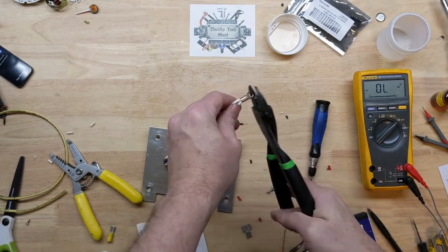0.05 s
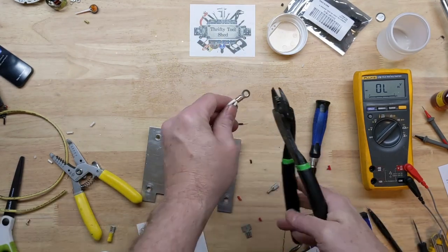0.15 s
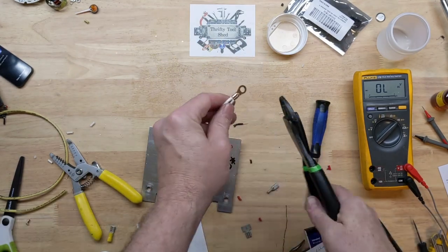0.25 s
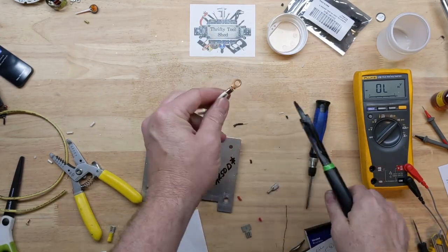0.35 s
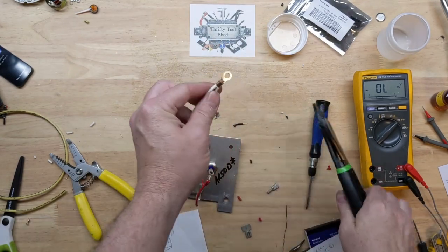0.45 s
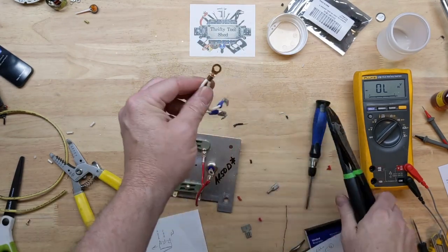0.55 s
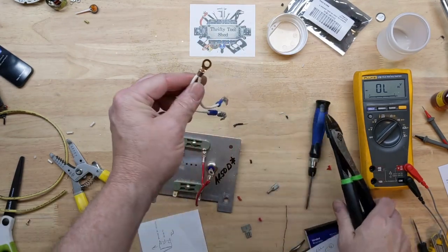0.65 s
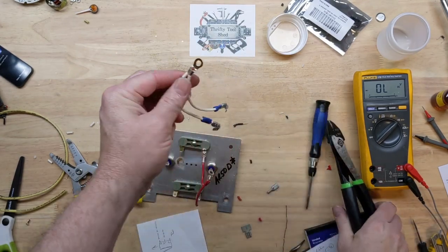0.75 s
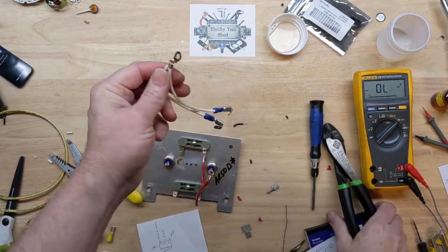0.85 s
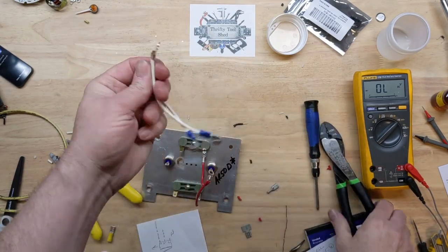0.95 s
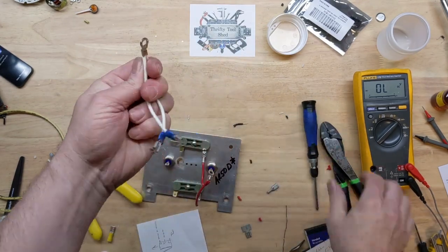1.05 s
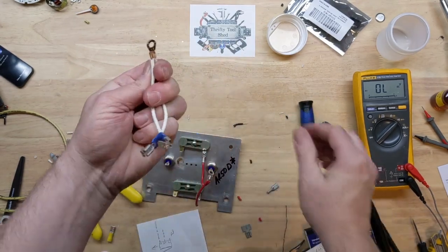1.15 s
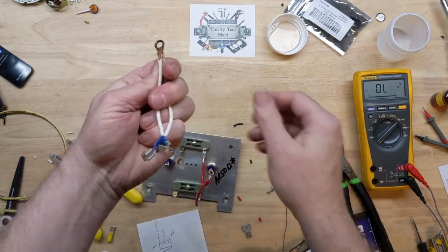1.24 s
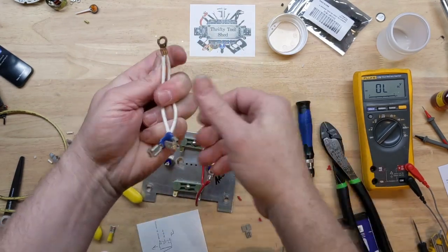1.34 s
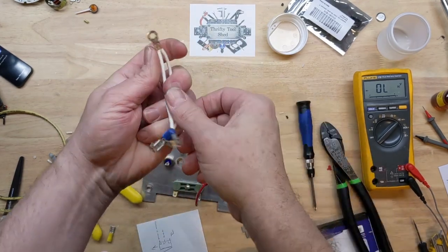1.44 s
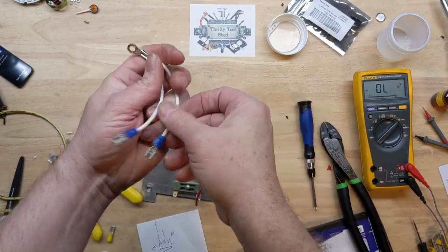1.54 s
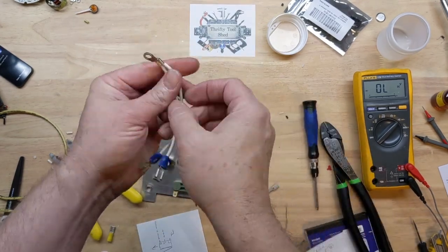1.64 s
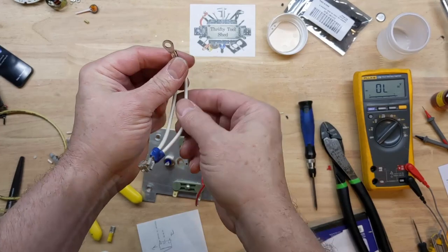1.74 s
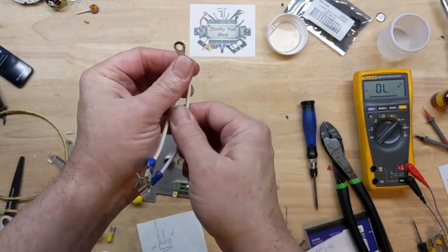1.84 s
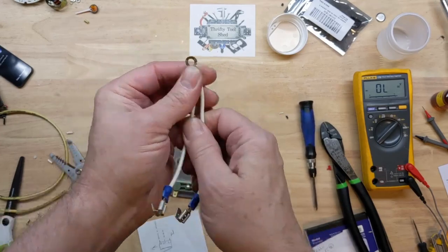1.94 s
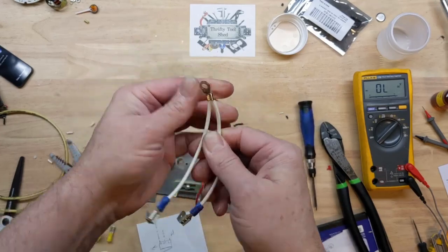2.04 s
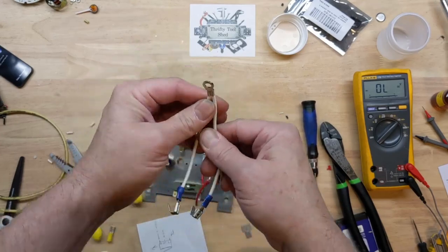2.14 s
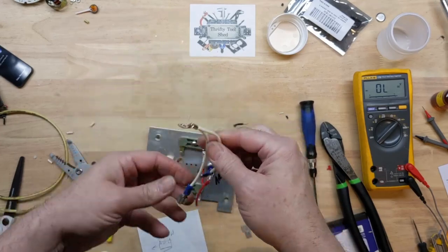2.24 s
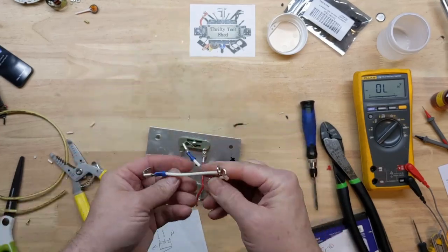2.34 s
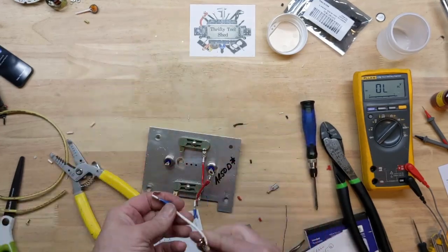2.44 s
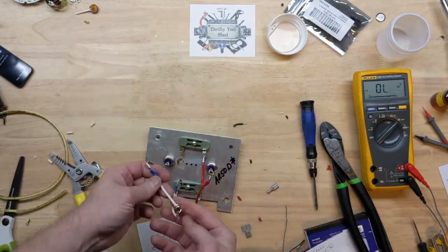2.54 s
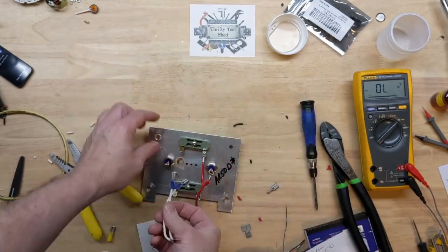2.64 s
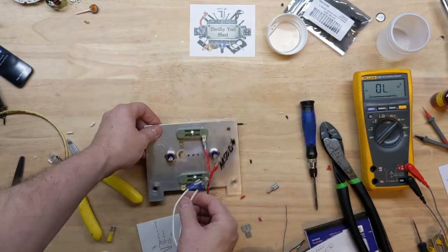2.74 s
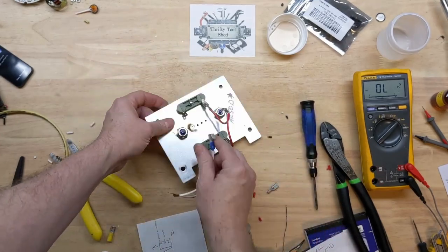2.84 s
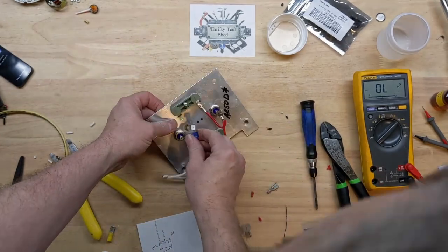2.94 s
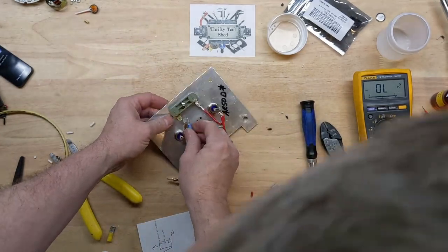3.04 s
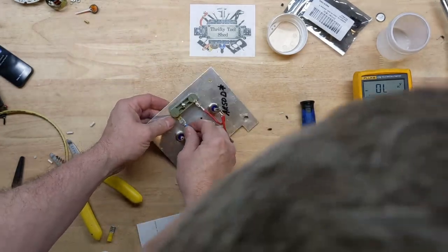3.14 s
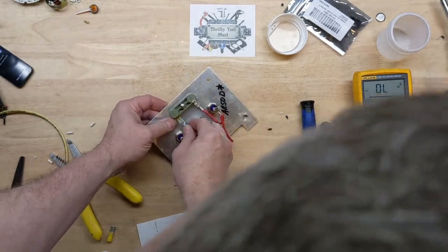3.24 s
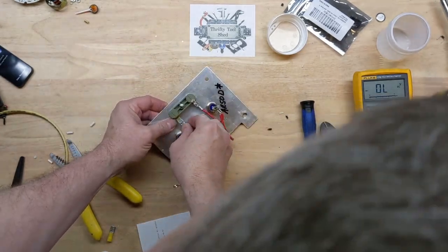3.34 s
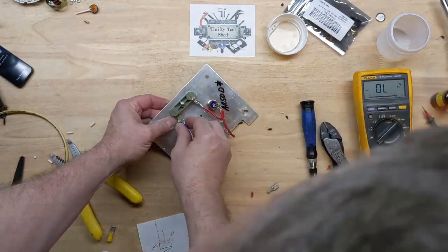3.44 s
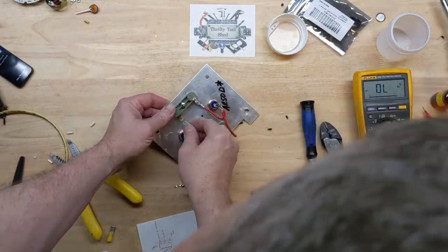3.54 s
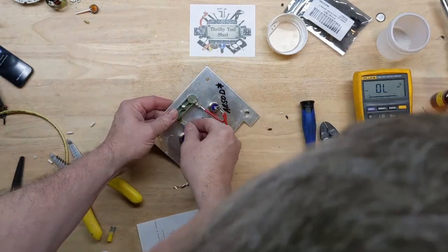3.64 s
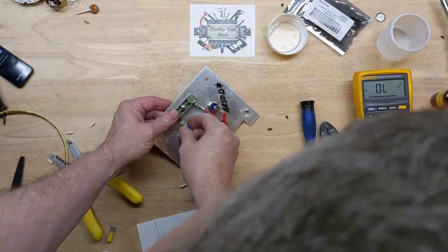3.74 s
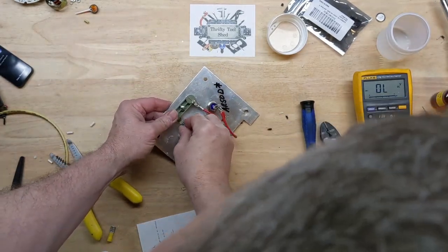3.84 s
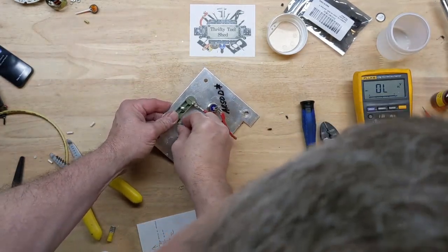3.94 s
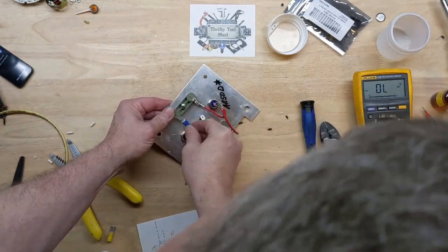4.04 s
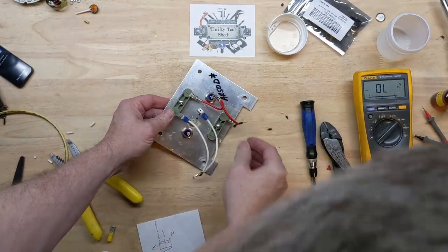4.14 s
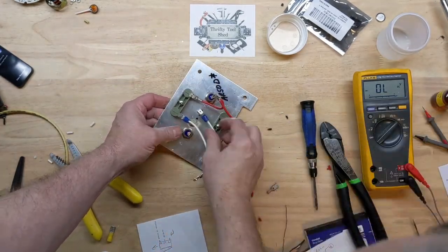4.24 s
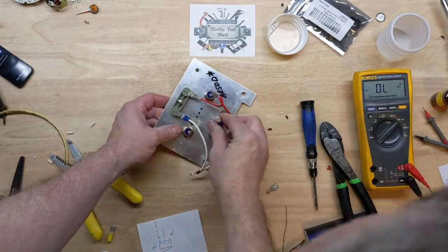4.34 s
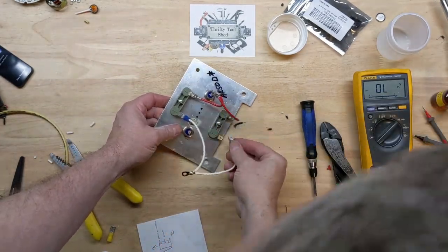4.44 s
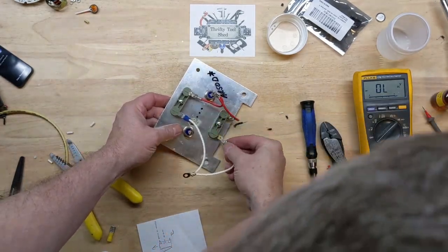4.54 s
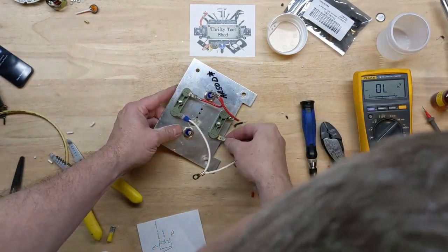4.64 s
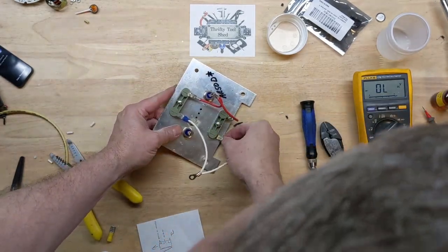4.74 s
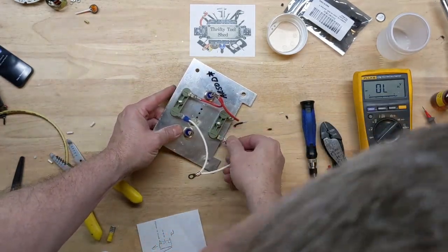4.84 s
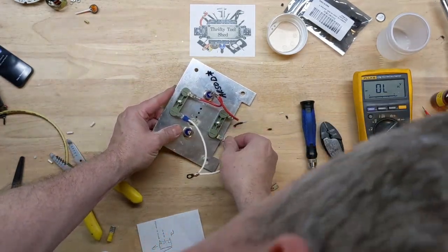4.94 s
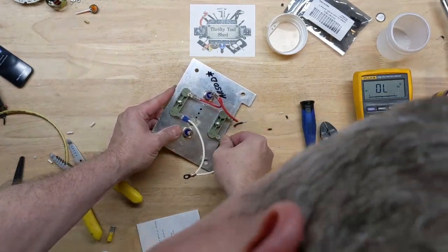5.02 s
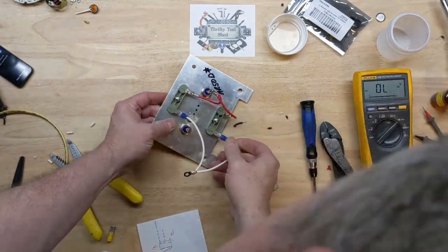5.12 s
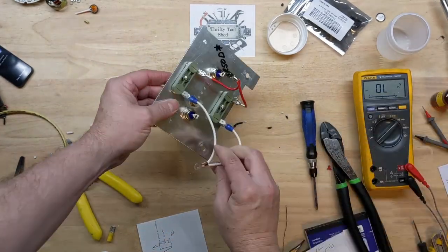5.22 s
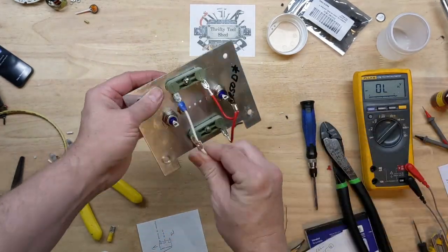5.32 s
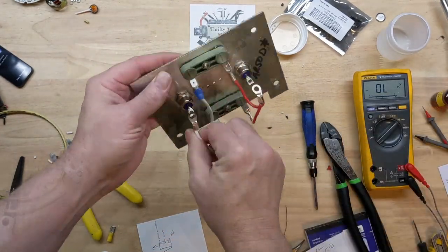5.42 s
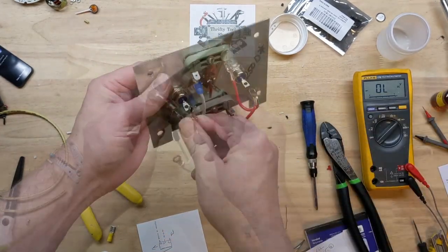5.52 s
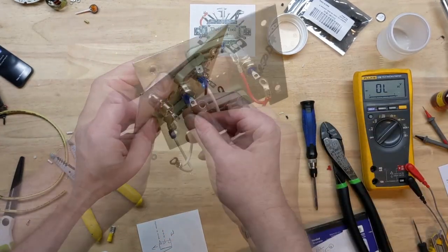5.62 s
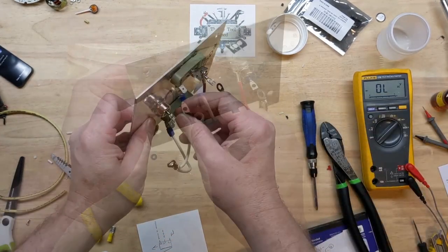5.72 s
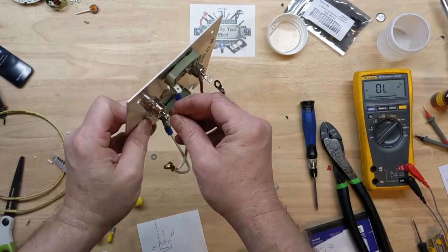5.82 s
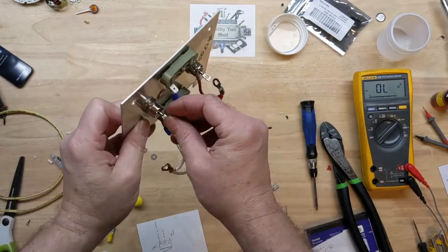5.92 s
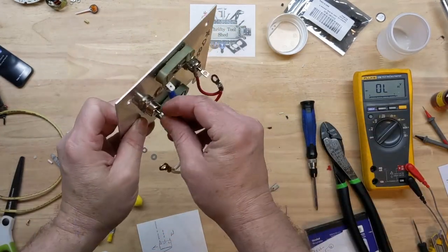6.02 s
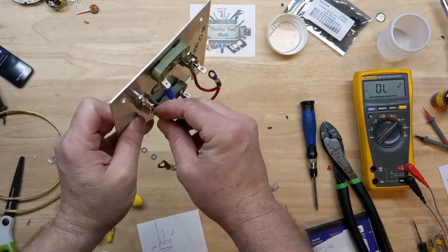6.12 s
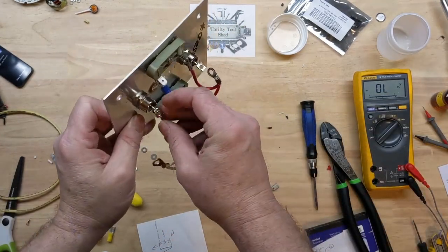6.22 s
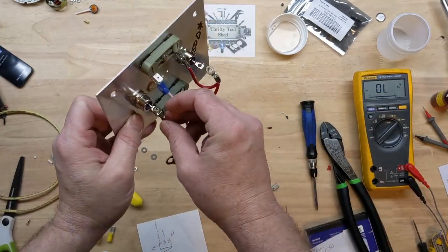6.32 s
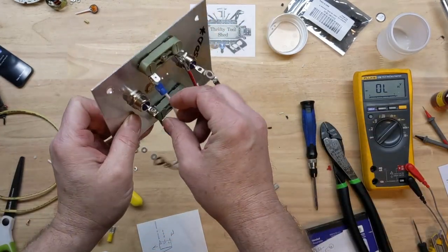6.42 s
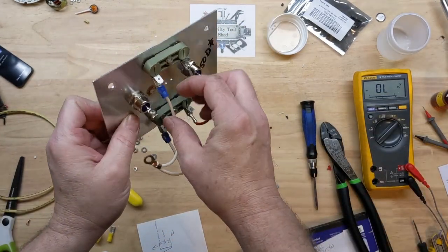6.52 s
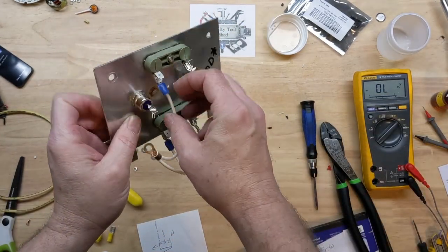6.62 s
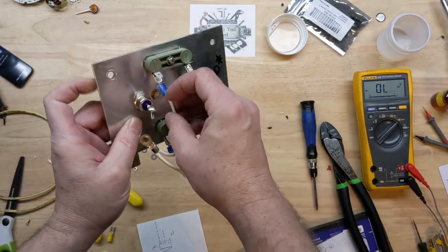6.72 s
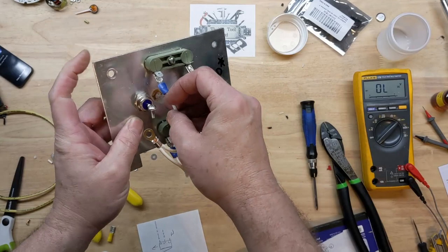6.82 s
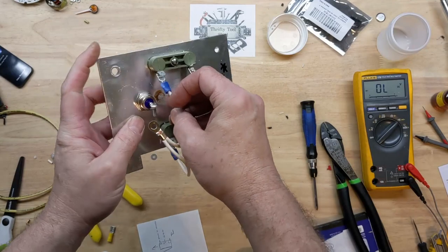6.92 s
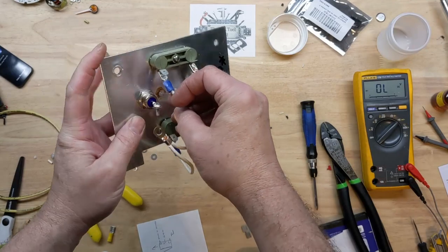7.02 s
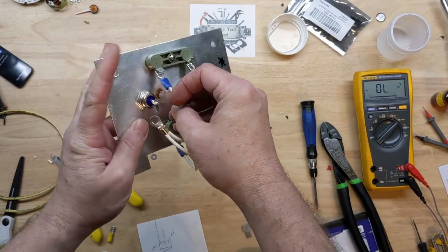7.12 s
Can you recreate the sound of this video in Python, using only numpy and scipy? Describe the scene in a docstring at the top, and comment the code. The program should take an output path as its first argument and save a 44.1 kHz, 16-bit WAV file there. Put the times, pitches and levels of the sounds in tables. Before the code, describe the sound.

Close over a wooden workbench in a quiet small room: a crisp steel jaw click, then heavy pliers knock down and rock with a low woody rumble and faint clinks. Wire rubs softly through fingers. A metal plate scrapes and bumps down in hard, hollow clacks, the loudest moment. Lighter nudges and taps follow, then delicate terminal scrapes and a brief stick-slip rasp over low room rumble, hiss and thin whine.

```python
"""Crimping pliers and metal plate on a workbench

Close over the wood, plier jaws click as noise bursts through steel resonances, then the tool lands and rocks.
A wire slides through the fingers, a plate is dragged, bumped and tilted, and a terminal scrapes onto its tab:
bursts of tiny slips ring each object's resonances, and damped sines add the bench thumps and steel clinks.
Filtered noise makes the room rumble and hiss, a wavering sine the thin electrical whine;
a decaying noise tail adds the short echo."""
import sys
import numpy as np
from scipy import signal
from scipy.fft import rfft, irfft, next_fast_len
from scipy.io import wavfile
from scipy.ndimage import map_coordinates

SR = 44100
rng = np.random.default_rng(int(sys.argv[2]) if len(sys.argv) > 2 else 0)


def wav_record(signal):
    """Record a signal, one row per channel, as 16-bit PCM in the file named by sys.argv[1]."""
    frames = np.transpose(np.atleast_2d(signal))
    bounded = np.clip(frames, -1, 1)
    # unit amplitude maps onto the largest positive 16-bit level
    quanta = np.round(bounded * 32767).astype(np.int16)
    wavfile.write(sys.argv[1], SR, quanta)


N = 316165
TIME = np.arange(N) / SR

# Event levels are relative: stroke energy and layer trims still act on them.
# Brightness tilts the sound above 1700 Hz; a stroke's length runs between its -20 dB points.
# Steel jaws meet and bounce: (time [s], level [dB], time to fade by 20 dB [s])
JAWS = [(0.4166, -30.5, 0.032), (0.4261, -42, 0.07)]
# Pliers land and settle on the bench: (time [s], level [dB], brightness [dB per octave])
KNOCKS = [(.896, -33.5, 2), (.919, -19, 0), (.957, -30, -4), (1.026, -34, -6), (1.047, -36, -0.5),
          (1.107, -28, -1), (1.153, -25.5, 2), (1.329, -53, 2)]
# Hands and handles brush over the wood: (time [s], level [dB], length [s], brightness [dB per octave])
HANDLES = [(.15, -53.5, 0.18, 10), (.875, -53, 0.22, 8), (1.0, -48.5, 0.69, 2), (2.56, -52.5, 0.2, 6),
           (4.25, -62, 0.45, 5), (5.2, -58.5, .17, -11.5)]
# Pliers' steel clinks on the hardest knocks: (time [s], level [dB])
CLINKS = [(.924, -38), (1.109, -45), (1.153, -39)]
# Wire runs through the fingers: (time [s], level [dB], length [s], brightness [dB per octave])
SLIDES = [(1.465, -55, 0.31, -0.4), (1.628, -48, 0.084, -1.3), (1.66, -48.5, 0.068, -3.5)]
# Plate skids and taps on the bench: (time [s], level [dB], length [s], brightness [dB per octave])
SHIFTS = [ (2.905, -23, 0.018, -3.5), (2.920, -22.5, 0.031, -2), (2.968, -17.5, 0.029, -0.5),
          (2.999, -25, 0.059, -2.5), (3.078, -17, .027, 1), (3.361, -51, 0.04, -5.5),
          (3.42, -51, 0.073, -0.5), (4.029, -39.5, 0.028, 0), (4.087, -42, 0.07, -1.5),
          (4.147, -40, 0.045, .5), (4.185, -41, 0.073, -3), (4.36, -45, 0.054, -2.5),
          (4.619, -42, 0.019, 0.5), (4.802, -42.5, 0.019, -1.5), (4.886, -52, 0.038, -9.5),
          (5.005, -48.5, 0.03, -6), (5.082, -30, 0.032, -4.5), (5.18, -54, 0.45, -.5),
          (6.972, -50, 0.066, -1.5), (7.146, -42.5, 0.044, -1.5)]
# Bench top takes the plate's weight: (time [s], level [dB])
THUMPS = [(2.901, -16), (2.976, -34), (3.073, -56), (4.022, -43), (4.793, -54), (5.075, -32.5)]
# Plate comes down corner by corner: (delay [s], level [dB])
CORNERS = [(0, -1), (.008, -0.5), (.017, -8)]
# Metal edges and terminals scrape: (time [s], level [dB], length [s], brightness [dB per octave])
SCRAPES = [(2.556, -42, 0.12, 1), (2.765, -46.5, 0.054, 11), (2.794, -36.5, 0.07, -3.5),
           (2.821, -27, 0.062, -3.5), (5.457, -35, 0.013, 2.5), (5.502, -43.5, 0.12, 1),
           (6.003, -46.5, 0.071, -4), (6.538, -47.5, 0.085, 5.5), (6.745, -54.5, 0.2, 11)]
# Terminal is pushed onto its tab in a run of slips: (start [s], length [s], level [dB], growth [dB per s])
PUSHES = [(6.125, .095, -37.5, 19), (6.297, .05, -38.5, -190)]
# Small parts touch: (time [s], level [dB], brightness [dB per octave])
TICKS = [(.131, -52, -12.5), (.153, -48, 5.5), (1.886, -50.5, -2.5), (1.91, -49, 21), (2.453, -56, -12),
         (3.195, -54, -7), (4.603, -52.5, -7.5), (5.618, -49.5, -4), (5.636, -60.5, -6), (5.998, -60, -5.5)]

# Broad colour of each thing: (frequency [Hz], relative level [dB])
JAW_COLOUR = [(300, -52), (800, -12), (1150, -37), (1800, -8), (3800, -7.5), (5300, 1), (7400, -13.5),
              (8800, -8.5), (10000, -16), (15500, -7)]
BENCH_COLOUR = [(25, -26.5), (50, -3.5), (110, -5.5), (200, -4), (260, -7), (380, -7.5), (700, -3),
                (900, -11.5), (1400, -10.5), (2200, -18.5), (4500, -24.5), (8000, -30.5), (15500, -33.5)]
WIRE_COLOUR = [(400, -18), (1000, -12), (1400, 2), (2600, -11), (4200, -3.5), (5600, -13), (7500, -15),
               (9000, -17.5), (15500, -37.5)]
PLATE_COLOUR = [(30, -37), (120, 5.5), (420, -18.5), (680, -15.5), (900, -12.5), (1100, -7.5), (1700, -4.5),
                (2700, -4.5), (4200, 2), (5400, -3), (9500, -8.5), (11000, -4.5), (15500, -14.5)]
# The plate's hollow note: (frequency [Hz], relative level [dB])
TOCK_COLOUR = [(900, -59), (1400, -23.5), (1720, -0.5), (2050, -16.5), (2550, -9.5), (3500, -30),
               (8000, -50)]
TERMINAL_COLOUR = [(300, -34.5), (1200, -17.5), (1900, -5), (3000, 0), (4100, -2), (6000, -2.5), (8600, -9),
                   (10500, -12), (15500, -19)]
TICK_COLOUR = [(1000, -39), (4000, -19), (6200, -4.5), (9000, -13.5), (13000, -8.5), (15500, -20)]
RUMBLE_COLOUR = [(20, -36), (45, -7), (75, 0), (120, -3.5), (160, 3.5), (210, -4), (290, 4.5), (420, -15.5),
                 (800, -33), (2000, -30)]
DRONE_COLOUR = [(20, -21), (50, -2), (110, 0), (160, -17), (400, -30), (1500, -80.5)]
HISS_COLOUR = [(100, -25.5), (350, -6.5), (700, -4), (950, -9.5), (1450, -7), (2300, -7.5), (4400, -11.5),
               (6300, -13.5), (8400, -20), (11000, -16.5), (14500, -12.5), (15800, -15.5)]

# Resonances of each thing: (frequency [Hz], width [Hz], level above the broad colour [dB])
JAW_MODES = [(1866, 71, 7), (2670, 21, -2), (4650, 64, 6), (5030, 78, -3), (5550, 320, 0), (6230, 89, 6),
             (8660, 350, 8.5)]
BENCH_MODES = [(210.3, 18, -3), (341, 18, 4), (382, 8.7, 8), (428.4, 4.7, -1), (552, 18.6, 8.5),
               (642, 11, -4.5), (754, 102, 0), (1013, 13, 14), (1397, 17, -2.5), (4550, 180, 1.5),
               (6350, 340, 1.5)]
WIRE_MODES = [(1778, 12, 18), (2427, 22, 20), (3120, 24, 16), (3880, 25, 6), (4220, 25, 7),
              (5040, 41, 13.7), (5980, 60, 19.7), (7040, 19, 21.5), (8200, 32, 14)]
PLATE_MODES = [(1066, 24, 5.4), (1575, 36, 9), (1736, 114, 9), (1896, 15, 10), (2450, 30, 5),
               (3312, 180, 2.5), (3890, 25, -1), (4460, 200, -10), (6220, 490, -5.5)]
TOCK_MODES = [(1667, 83, 3)]
TERMINAL_MODES = [(1879, 86, 6.4), (2460, 25, 4.1), (3440, 44, 1), (4110, 560, 1), (8200, 72, 2.4)]
# Ringing of the bench top under a thump: (frequency [Hz], time to decay by 60 dB [s], level [dB])
THUMP_MODES = [(50, 0.12, -25), (112, 0.048, 1.5), (166.4, 0.11, -6.5), (337, 0.052, -9), (442, 0.11, -23),
               (653, 0.032, -13.5), (806, 0.12, -23)]
# Ringing of the pliers' steel: (frequency [Hz], time to decay by 60 dB [s], level [dB])
CLINK_MODES = [(4200, 0.056, -3), (4410, 0.082, 1), (6540, 0.07, 0.5)]
# Decay of the room: (frequency [Hz], time to decay by 60 dB [s])
ROOM = [(100, 0.12), (600, 0.14), (2500, 0.87), (6000, 0.64), (15000, 0.1)]

TOP_HZ = 15900
MODE_SCATTER_DB = 2.5
# Times to swell and to fade by 20 dB
KNOCK_SWELL_S, KNOCK_FADE_S = 0.0028, 0.042
TICK_SWELL_S, TICK_FADE_S = 0.0055, 0.012
SLIP_SWELL_S, SLIP_FADE_S = 0.0033, 0.056
SLIP_PERIOD_S, SLIP_SCATTER_S = 0.0147, 0.001
# A hand works a terminal to and fro, nudging the plate ever more gently
WIGGLE_START_S, WIGGLE_PERIOD_S, WIGGLE_SCATTER_S = 3.459, 0.0615, 0.0069
WIGGLE_DB, WIGGLE_LOSS_DB_PER_S, NUDGE_LENGTH_S, NUDGE_BRIGHT_DB = -47.5, 22.5, 0.079, -2.5
# Hollow note: level against its contact, and gain for each dB per octave of dullness
TOCK_DB, TOCK_DB_PER_DULLNESS = -18, 3.7
# The bench hums from the landing of the pliers until they stop rocking
ROCK_START_S, ROCK_STOP_S, ROCK_DB, ROCK_HZ = 0.93, 1.21, -32.5, 108
ROCK_RISE_DB_PER_S, ROCK_SAG_DB_PER_S, ROCK_RELEASE_DB_PER_S = 710, 29.5, 260
RUMBLE_DB, RUMBLE_RISE_DB_PER_S, RUMBLE_SWAY_DB = -71, 0.66, 3.5  # level at time 0, then a slow rise
DRONE_START_S, DRONE_RISE_S, DRONE_DB = 5.58, 0.19, -67  # a deeper rumble sets in
# The whine is louder for a while
WHINE_FROM_S, WHINE_TO_S, WHINE_DB, WHINE_SWELL_DB, WHINE_HZ = 1.8, 5.1, -85.5, 7, 2812


def amp(db):
    """Decibels to gain."""
    return 10 ** (np.asarray(db) / 20)


def unit(x):
    """Scaled to rms 1."""
    return x / np.sqrt(np.mean(x ** 2) + 1e-20)


def along(points, hz):
    """(Hz, value) points read on a log axis."""
    f, v = np.transpose(points)
    return np.interp(np.log(hz + 1), np.log(f + 1), v)


def wobble(rate, size):
    """A smooth random curve with rate knots a second."""
    knots = rng.standard_normal(size // 8 + 4)
    return map_coordinates(knots, [np.arange(size) * rate / SR], order=2, mode="wrap")


def gate(s, rise):
    """Opens from 0 to 1 over the rise time from time s on."""
    return np.clip((TIME - s) / rise, 0, 1)


def add(track, s, sound):
    """Mix a sound into the track from time s on."""
    start = round(s * SR)
    part = sound[..., max(-start, 0):N - start]
    track[..., max(start, 0):max(start, 0) + part.shape[-1]] += part


def spread(pair, hz, mono_hz):
    """Two unrelated spectra to left and right: long waves reach both microphones alike."""
    side = np.sqrt(0.5 / (1 + (mono_hz / (hz + 1)) ** 1.3))
    mid = np.sqrt(1 - side ** 2)
    return np.array([mid * pair[0] + side * pair[1], mid * pair[0] - side * pair[1]])


def noise(colour, mono_hz):
    """Steady stereo noise of rms 1, coloured in the spectrum."""
    size = next_fast_len(N)
    hz = np.fft.rfftfreq(size, 1 / SR)
    stereo = spread(rfft(rng.standard_normal((2, size))), hz, mono_hz)
    return unit(irfft(stereo * amp(along(colour, hz)), size)[:, :N])


def causal(gain_db):
    """The minimum-phase response with this gain: it rings only after it is struck."""
    cepstrum = irfft(np.log(amp(gain_db)))
    half = cepstrum.shape[-1] // 2
    fold = np.r_[1, np.full(half - 1, 2), 1, np.zeros(half - 1)]
    return np.exp(rfft(cepstrum * fold))


def body(hz, colour, modes, bright_db, ripple_db):
    """An object's response to contact: broad colour, main resonances and a crowd of small high ones."""
    crowd = map_coordinates(rng.standard_normal(400), [hz / 110], order=2, mode="wrap")
    tilt = bright_db * np.log2(np.maximum(hz / 1700, 1))
    broad = along(colour, hz) + tilt + ripple_db * crowd * hz / (hz + 1500)
    rings = 0
    for centre, width, db in modes:
        # the point of contact decides how strongly each resonance answers
        strength = amp(db + rng.normal(0, MODE_SCATTER_DB))
        damping = 1j * hz * width
        rings = rings + strength * damping / (centre ** 2 - hz ** 2 + damping)
    response = causal(broad) * (1 + rings)
    return response / np.sqrt(np.mean(np.abs(response) ** 2))


def contacts(rows, colour, modes, grit_db, grit_rate, ripple_db, mono_hz, left_db, size=24576):
    """Each contact is a burst of tiny slips that swells, fades and rings the object's resonances.
    Rows: (peak time [s], level [dB], 20 dB swell [s], 20 dB fade [s], brightness [dB per octave])."""
    out, lead = np.zeros((2, N)), 0.12  # seconds kept ahead of the peak
    t, hz = np.arange(size) / SR - lead, np.fft.rfftfreq(size, 1 / SR)
    lean = amp(np.outer([0.5, -0.5], left_db * hz / (hz + 5000)))  # treble is the most directional
    for s, db, swell, fade, bright_db in rows:
        force = amp(-20 * np.maximum(-t / swell, t / fade))
        grit = unit(amp(grit_db * np.tanh(wobble(grit_rate, size))))
        slips = grit * rng.standard_normal((2, size))
        ringing = spread(rfft(force * slips), hz, mono_hz) * body(hz, colour, modes, bright_db, ripple_db)
        energy = np.sqrt(np.mean(force ** 2))  # the stroke alone sets how much sound there is
        add(out, s - lead, amp(db) * energy * unit(irfft(ringing * lean, size)))
    return out


def taps(rows, swell, fade):
    """(time, level, brightness) rows become contacts that share one swell and one fade time."""
    return [(s, db, swell, fade, bright_db) for s, db, bright_db in rows]


def strokes(rows, swell_share):
    """Rows with a length become contacts that swell for a share of it and fade for the rest."""
    return [(s, db, length * swell_share, length * (1 - swell_share), bright_db)
            for s, db, length, bright_db in rows]


def ring(modes, scatter, size=8192):
    """Damped modes after one blow; each microphone meets them at its own phase."""
    t = np.arange(size) / SR
    tones = 0
    for hz, t60, db in modes:
        phase = rng.normal(0, scatter, (2, 1))
        tones = tones + amp(db - 60 * t / t60) * np.sin(2 * np.pi * hz * t + phase)
    return tones * (1 - np.exp(-t / 0.0013))


def background():
    """Coloured noise gives room rumble and even hiss; a wavering sine gives a thin electrical whine."""
    rumble_db = RUMBLE_DB + RUMBLE_RISE_DB_PER_S * TIME + RUMBLE_SWAY_DB * wobble(3.3, N)
    rumble = amp(rumble_db) * noise(RUMBLE_COLOUR, mono_hz=298)
    drone = amp(DRONE_DB) * gate(DRONE_START_S, DRONE_RISE_S) * noise(DRONE_COLOUR, mono_hz=400)
    hiss = amp(-65.5) * noise(HISS_COLOUR, mono_hz=202)
    louder = gate(WHINE_FROM_S, 0.18) - gate(WHINE_TO_S, 0.084)
    whine_db = WHINE_DB + WHINE_SWELL_DB * louder + 0.91 * wobble(2.7, N)
    whine = amp(whine_db) * unit(np.sin(2 * np.pi * WHINE_HZ * TIME + 0.5 * wobble(3.4, N)))
    return rumble + drone + hiss + whine


def room(x):
    """The walls answer after a short delay; the upper mids linger longest."""
    hz, t, z = signal.stft(rng.standard_normal((2, SR // 2)), SR, nperseg=256)
    tail = signal.istft(z * amp(-60 * t / along(ROOM, hz)[:, None]), SR, nperseg=256)[1]
    tail = np.pad(tail / np.linalg.norm(tail[0]), ((0, 0), (SR // 150, 0)))  # delay of 1/150 s
    return signal.fftconvolve(x, tail, axes=1)[:, :N]


def wire():
    """The wire and its ring terminal rub through the fingers and sing faintly at narrow resonances."""
    slides = contacts(strokes(SLIDES, swell_share=0.24), WIRE_COLOUR, WIRE_MODES,
                      grit_db=3, grit_rate=220, ripple_db=2, mono_hz=150, left_db=-1.5)
    return amp(2) * slides


def stick_slip():
    """A pushed terminal sticks and lets go at a nearly even rate, each slip with its own brightness."""
    slips = []
    for start, length, db, growth_db in PUSHES:
        for age in np.arange(0, length, SLIP_PERIOD_S):
            s = start + age + SLIP_SCATTER_S * rng.standard_normal()
            slips.append((s, db + growth_db * age, 2.4 * rng.standard_normal() - 0.3))
    return taps(slips, SLIP_SWELL_S, SLIP_FADE_S)


def terminal():
    """Metal sticks and slips on metal; small parts tick against each other."""
    rubs = strokes(SCRAPES, swell_share=0.44) + stick_slip()
    scrapes = contacts(rubs, TERMINAL_COLOUR, TERMINAL_MODES,
                       grit_db=3.5, grit_rate=850, ripple_db=6, mono_hz=700, left_db=2.5)
    ticks = contacts(taps(TICKS, TICK_SWELL_S, TICK_FADE_S), TICK_COLOUR, [],
                     grit_db=4, grit_rate=540, ripple_db=6, mono_hz=300, left_db=4)
    return amp(-1.5) * scrapes + amp(1.5) * ticks


def wiggle(count):
    """Nearly even nudges that weaken as the terminal settles."""
    ages = WIGGLE_PERIOD_S * np.arange(count) + WIGGLE_SCATTER_S * rng.standard_normal(count)
    return [(WIGGLE_START_S + age, WIGGLE_DB - WIGGLE_LOSS_DB_PER_S * age, NUDGE_LENGTH_S, NUDGE_BRIGHT_DB)
            for age in ages]


def bench_thumps():
    """The plate's corners land one after another and ring the bench top's damped modes."""
    thumps = np.zeros((2, N))
    for s, db in THUMPS:
        for delay, corner_db in CORNERS:
            add(thumps, s + delay, amp(db + corner_db) * ring(THUMP_MODES, scatter=0.75))
    # the top radiates little deep bass
    return signal.sosfilt(signal.butter(2, 45, "high", fs=SR, output="sos"), thumps)


def plate():
    """The plate chatters over the wood; dull contacts bring out its hollow note, landings thump the bench."""
    skids = strokes(SHIFTS + wiggle(count=7), swell_share=0.37)
    chatter = contacts(skids, PLATE_COLOUR, PLATE_MODES,
                       grit_db=5, grit_rate=590, ripple_db=5, mono_hz=80, left_db=2.5)
    notes = []
    for s, db, swell, fade, bright_db in skids:
        note_db = min(TOCK_DB - TOCK_DB_PER_DULLNESS * bright_db, 0)
        notes.append((s, db + note_db, swell, fade, 0))
    tocks = contacts(notes, TOCK_COLOUR, TOCK_MODES,
                     grit_db=3, grit_rate=440, ripple_db=4.5, mono_hz=900, left_db=-1)
    return bench_thumps() + amp(-1.5) * chatter + amp(-3.5) * tocks


def jaws(size=16384):
    """Steel strikes steel: an almost instant crack of noise rings the jaws."""
    out, t, hz = np.zeros((2, N)), np.arange(size) / SR, np.fft.rfftfreq(size, 1 / SR)
    steel = body(hz, JAW_COLOUR, JAW_MODES, bright_db=-1.5, ripple_db=2.5)
    for s, db, fade in JAWS:
        force = amp(db - 20 * t / fade) * (1 - np.exp(-t / 0.00027))
        crack = force * rng.standard_normal((2, size))
        add(out, s, irfft(spread(rfft(crack), hz, mono_hz=1490) * steel, size))
    return out


def clinks():
    """The pliers' own steel rings briefly in damped modes when they hit the wood."""
    out = np.zeros((2, N))
    for s, db in CLINKS:
        add(out, s, amp(db) * ring(CLINK_MODES, scatter=0.98))
    return out


def rocking():
    """The rocking tool shakes the bench top: an uneven low hum starts fast, sags and lets go."""
    tone = np.sin(2 * np.pi * ROCK_HZ * TIME + 0.6 * wobble(28.85, N))
    hum = unit(tone * amp(3.2 * wobble(45.6, N)))
    age = TIME - ROCK_START_S
    rise_and_sag = np.minimum(ROCK_RISE_DB_PER_S * age, -ROCK_SAG_DB_PER_S * age)
    release = ROCK_RELEASE_DB_PER_S * np.maximum(TIME - ROCK_STOP_S, 0)
    return amp(ROCK_DB + rise_and_sag - release) * hum


def pliers():
    """The tool knocks on the bench and rocks; hands and handles brush the same resonant wood."""
    landing = contacts(taps(KNOCKS, KNOCK_SWELL_S, KNOCK_FADE_S), BENCH_COLOUR, BENCH_MODES,
                       grit_db=4, grit_rate=440, ripple_db=4, mono_hz=735, left_db=0.5)
    brush = contacts(strokes(HANDLES, swell_share=0.45), BENCH_COLOUR, BENCH_MODES,
                     grit_db=7.5, grit_rate=77, ripple_db=4, mono_hz=300, left_db=3)
    return landing + rocking() + amp(0.5) * brush


def scene():
    """Everything on the bench, each with its share of room sound."""
    snap, landing = jaws(), pliers() + clinks()
    handling, fitting = wire() + plate(), terminal()
    echo = room(amp(-24.5) * snap + amp(-10) * landing + amp(-35) * handling + amp(-17) * fitting)
    return background() + echo + handling + fitting + snap + landing


def record(dry):
    """The recorder keeps nothing above its band limit."""
    size = next_fast_len(N + 8192)
    passed = np.fft.rfftfreq(size, 1 / SR) < TOP_HZ
    return irfft(rfft(dry, size) * passed, size)[:, :N]


dry = scene()
out = record(dry)
wav_record(out)
```